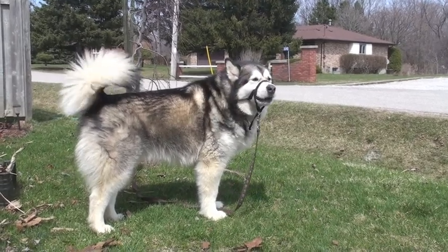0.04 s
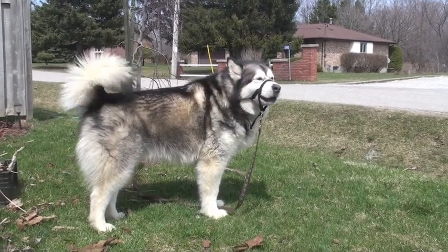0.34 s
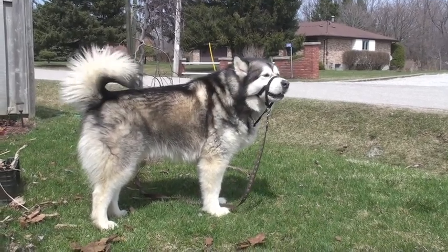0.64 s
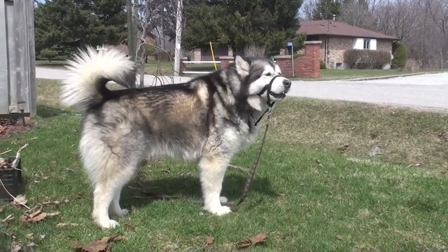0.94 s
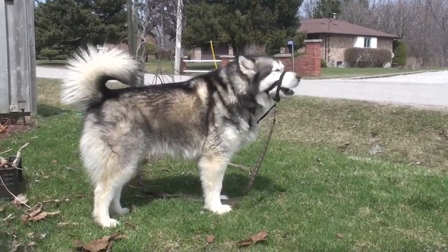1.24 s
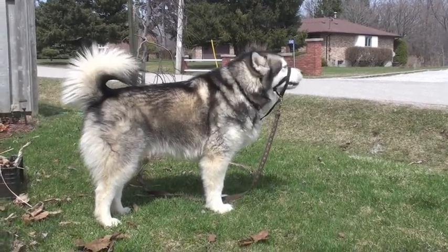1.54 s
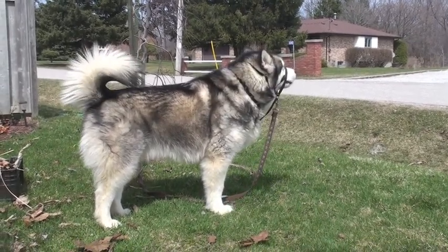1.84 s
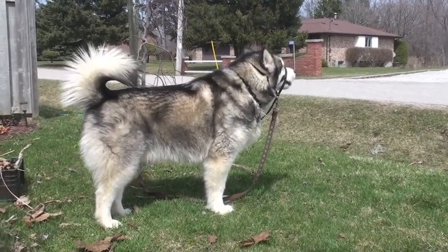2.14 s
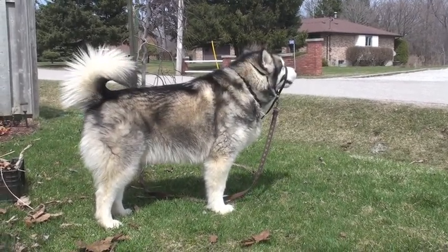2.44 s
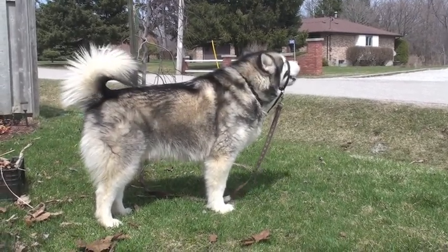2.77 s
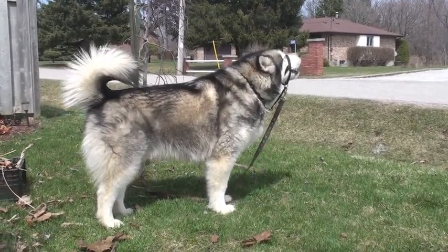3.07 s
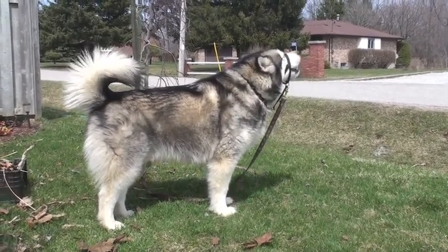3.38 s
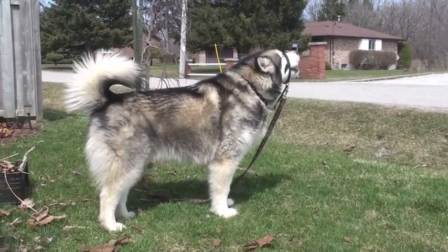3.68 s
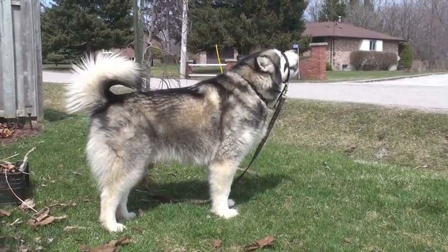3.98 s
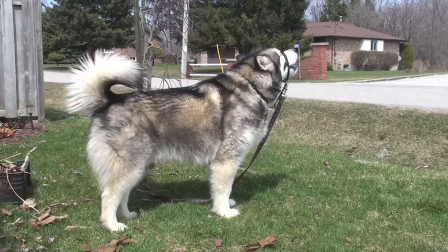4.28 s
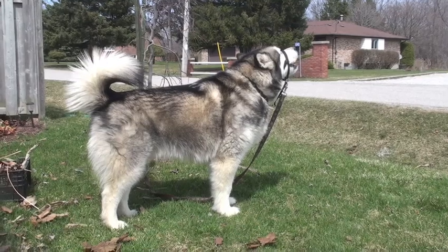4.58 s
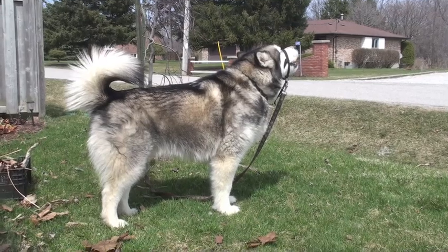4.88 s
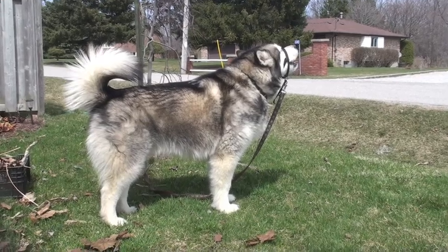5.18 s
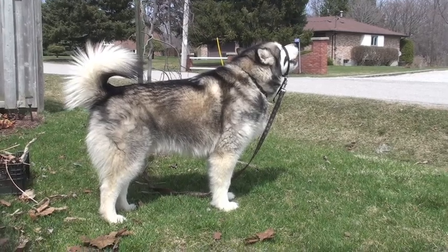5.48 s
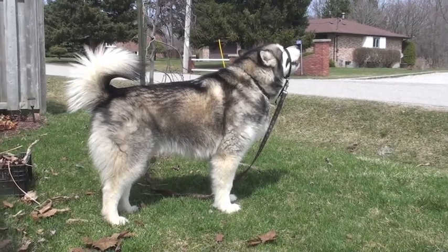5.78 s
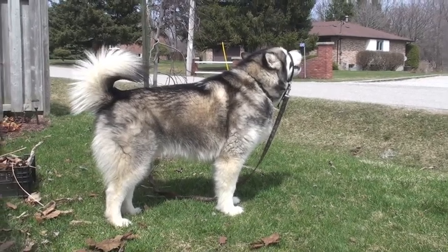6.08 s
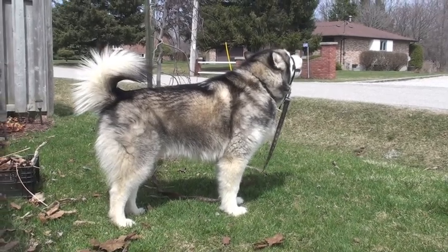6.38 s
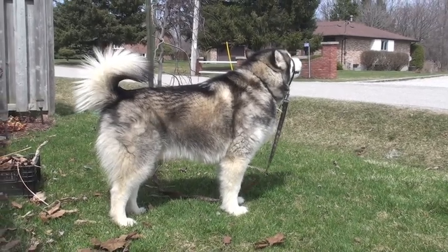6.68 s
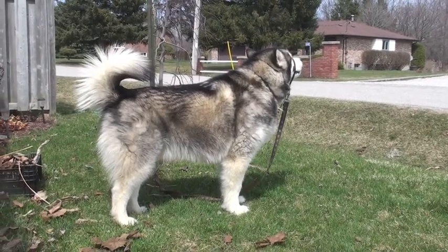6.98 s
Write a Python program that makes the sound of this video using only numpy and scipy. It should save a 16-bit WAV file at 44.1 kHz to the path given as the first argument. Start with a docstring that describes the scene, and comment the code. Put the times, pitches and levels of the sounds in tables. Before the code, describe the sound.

Outdoors near a quietly humming street, wind buffets the microphone while a big dog howls close by. One short howl slides down, followed by a quick breath and a pause. Then a short growl swells into a long, held howl that slowly falls and drops away. The dog sounds almost dry, with only slight reverberation from houses, and a distant bird gives a few faint chirps at the end.

```python
"""Over a humming street, with gusts buffeting the microphone, a big sled dog howls on a lawn a few steps away.
Its vocal folds give a sliding note whose harmonics flare and fade by interference with echoes from ground
and walls, until the folds slacken and the pitch sags. The dog draws a short hiss of air; then uneven slaps
of the folds make a rough growl that locks into a second, longer howl. As that one sags, a bird chirps
far off. The houses answer both with faint reverberation."""
import sys
import numpy as np
from scipy import signal
from scipy.fft import rfft, irfft, next_fast_len
from scipy.io import wavfile
from scipy.ndimage import uniform_filter1d, minimum_filter1d, map_coordinates

SR = 44100
rng = np.random.default_rng(int(sys.argv[2]) if len(sys.argv) > 2 else 0)


def waveform_to_disk(signal):
    """Save audio, clipped to [-1, 1], as 16-bit WAV at the path in sys.argv[1]."""
    frames = np.transpose(np.atleast_2d(signal))
    scaled = np.clip(frames, -1, 1) * 32767
    samples = np.round(scaled).astype(np.int16)
    wavfile.write(sys.argv[1], SR, samples)


N = 309582
TIME = np.arange(N) / SR


def amp(db):
    """Decibels to amplitude ratio."""
    return 10 ** (np.asarray(db) / 20)


def unit(x):
    """Normalisation to rms 1."""
    return x / np.sqrt(np.mean(x ** 2) + 1e-20)


def along(points, hz):
    """Interpolation of (Hz, value) points on a logarithmic frequency axis."""
    knots_hz, values = np.transpose(points)
    return np.interp(np.log(hz + 1), np.log(knots_hz + 1), values)


def curves(rows):
    """Linear interpolation in time: one curve for each column after the first."""
    times, *columns = np.transpose(rows)
    return [np.interp(TIME, times, column) for column in columns]


def sounding(rows, fade):
    """A gate with linear fades, open from the first row's time to the last."""
    return np.clip((TIME - rows[0][0]) / fade, 0, 1) * np.clip((rows[-1][0] - TIME) / fade, 0, 1)


def swell(start, length):
    """A half-sine envelope."""
    return np.sin(np.pi * np.clip((TIME - start) / length, 0, 1))


def held(start, length, attack, release):
    """An envelope that rises, holds until start + length, then decays exponentially."""
    age = TIME - start
    return np.clip(age / attack, 0, 1) * np.exp(-np.maximum(age - length, 0) / release)


def wobble(rate):
    """Smooth random modulation, rate knots a second."""
    return map_coordinates(rng.standard_normal(int(N * rate / SR) + 4), [TIME * rate])


def filtered(x, response):
    """Linear filtering: the spectrum of x times a frequency response."""
    size = next_fast_len(N + SR // 2)
    return irfft(rfft(x, size) * response(np.fft.rfftfreq(size, 1 / SR)), size)[..., :N]


def rush(spectrum, coherence):
    """Partially coherent stereo noise of rms 1, from (Hz, dB) and (Hz, left-right coherence) points."""
    def mid_and_side(hz):
        angle = np.arccos(np.clip(along(coherence, hz), -1, 1)) / 2
        return np.array([np.cos(angle), np.sin(angle)])
    mid, side = filtered(rng.standard_normal((2, N)), mid_and_side)
    return unit(filtered(np.array([mid + side, mid - side]), lambda hz: amp(along(spectrum, hz))))


# The street's hum. Each row: frequency in Hz, relative spectral density in dB.
STREET_SPECTRUM = [(59, -28.5), (100, -4), (270, -12), (347, -20.5), (487, -17.5), (712, -14.5), (842, -14),
                   (1210, -18), (1430, -19.5), (2270, -29), (3540, -39.5), (6120, -47.5), (7250, -45.5),
                   (15500, -54.5)]
# Its likeness in the two channels. Each row: frequency in Hz, coherence from 0 to 1.
STREET_COHERENCE = [(60, 0.65), (180, 0.29), (550, 1), (1650, 1), (4970, 0.46), (15000, 0.42)]

def street():
    """Superposition: far traffic and trees add up to a nearly steady noise."""
    return amp(-45.5 + 1.7 * wobble(3.2)) * rush(STREET_SPECTRUM, STREET_COHERENCE)


# Decay among the houses. Each row: frequency in Hz, time to fall by 60 dB in seconds.
REVERB_TIMES = [(300, 0.35), (1500, 0.98), (8000, 0.056)]

def houses(x):
    """Reverberation: diffuse reflections from fence, houses and trees, the treble dying first."""
    hz, age, noise = signal.stft(rng.standard_normal((2, SR // 2)), SR, nperseg=256)
    decay = amp(-60 * age / along(REVERB_TIMES, hz)[:, None])
    _, tail = signal.istft(noise * decay, SR, nperseg=256)
    return signal.fftconvolve(x, tail / np.linalg.norm(tail[0]), axes=1)[:, :N]


# Birdsong. Each row: start and length in seconds, first and last pitch in Hz, level in dB.
BIRD_CHIRPS = [(6.31, .055, 4400, 3300, -65), (6.85, .055, 4270, 3410, -64), (6.905, .045, 2982, 3640, -67)]

def bird():
    """Frequency modulation: each chirp from the far trees is one gliding, wavering tone."""
    song = np.zeros(N)
    for start, length, first_hz, last_hz, db in BIRD_CHIRPS:
        hz = np.interp(TIME, [start, start + length], [first_hz, last_hz]) * (1 + .06 * wobble(200))
        song += amp(db) * swell(start, length) * np.sin(2 * np.pi * np.cumsum(hz) / SR)
    return np.array([song, song])


# Gusts, and soft thuds of air. Each row: start in seconds, length in seconds, relative level in dB.
GUSTS = [(0.418, 0.3, -38.5), (0.754, 0.38, -35), (1.47, .3, -44), (2.18, 0.09, -34), (2.797, 0.24, -28),
         (3.415, 0.18, -33), (3.871, .22, -33.5), (4.316, 0.5, -31)]
AIR_THUDS = [(2.213, 0.049, -37), (2.304, 0.017, -41.5), (6.286, .075, -32)]
# The wind's low rumble and brighter rush. Each row: frequency in Hz, relative spectral density in dB.
RUMBLE_SPECTRUM = [(15, -17.5), (40, -4.5), (90, -1), (160, -6), (260, -17), (500, -32), (1200, -69.5)]
GUST_SPECTRUM = [(60, -21.5), (150, 3.5), (300, -5), (800, -12.5), (1300, -27), (3000, -62)]

def wind(breeze_drop_db_per_s=0.64):
    """Turbulence: eddies hit each microphone port separately; strong gusts reach higher frequencies."""
    breeze = amp(-44.5 - breeze_drop_db_per_s * TIME)
    blasts = sum(amp(db) * held(start, length, attack=0.049, release=0.095) for start, length, db in GUSTS)
    wind_db = 20 * np.log10(np.hypot(breeze, blasts)) + 1.8 * wobble(7.5)
    eddies = amp(1.5 * np.array([wobble(22), wobble(22)]))
    rumble = amp(wind_db + 2.57) * unit(eddies * rush(RUMBLE_SPECTRUM, [(40, 0.61), (300, 0)]))
    thuds = sum(amp(db) * swell(start, length) for start, length, db in AIR_THUDS)
    gusts = (amp(1.26 * wind_db + 2.0) + thuds) * rush(GUST_SPECTRUM, [(300, 0)])
    return (rumble + gusts) * amp([[.6], [-.6]])  # a little to the left


# Air with and between the howls. Each row: start, length, attack and release in seconds, level in dB.
BREATHS = [(.3, 1.56, 1.0, 0.042, -57.5), (1.98, 0.17, 0.016, 0.056, -54.5), (2.1, 2.8, .8, .7, -63)]
# Faint sharp ticks. Each row: time in seconds, relative peak level in dB.
FAINT_TICKS = [(1.775, -46.5), (2.0141, -43), (2.029, -46.5), (2.0837, -40), (3.1517, -57.5),
               (3.7794, -60.5), (4.0494, -56.5), (4.3692, -51), (4.814, -48), (4.848, -50), (5.7058, -54),
               (5.7131, -54)]
# The colour of hiss and ticks. Each row: frequency in Hz, relative spectral density in dB.
HISS_SPECTRUM = [(1470, -43.5), (2500, -2), (2680, -5.5), (7000, -2.5), (7730, -9.5), (12400, -14.5),
                 (14900, -26), (15500, -41)]

def breath_and_ticks():
    """Flow noise: a grainy hiss of breath; apart from it, a few faint sharp ticks and crackles."""
    flow = sum(amp(db) * held(*timing) for *timing, db in BREATHS)
    grain = amp(2.5 * wobble(170))
    ticks = sum(amp(db + 3) * held(start, 0, attack=.0001, release=0.0013) for start, db in FAINT_TICKS)
    return (flow * grain + ticks) * rush(HISS_SPECTRUM, [(3000, 0.67)])


# Formants of throat and mouth. Each row: centre in Hz, width in Hz, relative gain in dB.
TRACT_FORMANTS = [(449, 130, -1), (683, 140, -9), (807, 230, 0), (1276, 250, -15), (1495, 150, -11),
                  (1633, 230, -17.5), (2200, 390, -23.5), (3850, 300, -52.5), (6200, 870, -51),
                  (8300, 400, -55.5)]

def vocal_tract(x):
    """Resonance: the excitation x rings in the steep formants of throat and mouth; rms 1."""
    def response(hz):
        return sum(amp(db) / (1 + 1.7j * (hz - centre) / width) ** 3
                   for centre, width, db in TRACT_FORMANTS)
    return unit(filtered(x, response))


# The swelling growl. Each row: time in seconds, relative level in dB.
GROWL_LEVELS = [(2.6, -66.5), (2.632, -32), (2.656, -34.5), (2.662, -21.5), (2.742, -17.5), (2.788, -10.5),
                (2.8, -13.5)]

def growl(slap_hz=290, scatter=.055, lock_s=2.775, glide_s=.03, fade_db_per_s=278):
    """Aperiodic vibration: the folds slap unevenly, with puffs of air, then lock on the second howl."""
    locked = np.clip((TIME - lock_s) / glide_s, 0, 1)
    howl_hz, _ = curves(SECOND_MELODY)
    rate = (1 - locked) * slap_hz + locked * howl_hz
    db = curves(GROWL_LEVELS)[0] - fade_db_per_s * np.maximum(TIME - GROWL_LEVELS[-1][0], 0)
    cycles = np.cumsum(rate * (1 + scatter * wobble(300))) / SR
    slaps = np.diff(np.floor(cycles), prepend=0) * amp(1.5 * wobble(300))  # one impulse a cycle
    puffs = rng.standard_normal(N) * (1 + np.cos(2 * np.pi * cycles))
    return amp(db + 0.7) * vocal_tract(unit(slaps) + .35 * unit(puffs)) * (TIME > GROWL_LEVELS[0][0])


# Echoes off ground and walls. Each row: left and right delay in ms, left and right amplitude ratio.
EARLY_ECHOES = [(0.54, 0.52, 0.46, 0.57), (1.32, 1.33, 0.2, 0.3), (1.86, 1.84, 0.21, 0.16),
                (5.32, 5.2, 0.08, 0.15), (7.78, 7.7, 0.2, 0.15), (8.29, 8.2, 0.45, 0.29),
                (14.28, 14.29, 0.02, 0.07), (17.69, 17.61, 0.07, 0.08)]

def interference(hz):
    """Interference of the direct sound with its echoes: complex gain at the left and right port."""
    grid_hz = np.arange(SR // 2)
    delays_ms, gains = np.hsplit(np.array(EARLY_ECHOES), 2)
    echoes = gains[..., None] * np.exp(-2j * np.pi * grid_hz * delays_ms[..., None] / 1000)
    return np.array([np.interp(hz, grid_hz, port) for port in 1 + echoes.sum(axis=0)])


def throat_gain(rows, opening, hz):
    """A variable filter: its gain in dB moves between a table's closed and open columns."""
    table = np.array(rows)
    closed_db, open_db = along(table[:, [0, 1]], hz), along(table[:, [0, 2]], hz)
    return amp((1 - opening) * closed_db + opening * open_db)


# The howl's vowel. Each row: frequency in Hz, relative gain in dB with the jaw nearly shut, then open.
VOWEL_GAINS = [(250.0, -15, 2.1), (401, 1.5, -12.5), (600.0, 15.5, -14.5), (813, 3, 12.1), (965, -3.5, 8.5),
               (1248.4, 3.5, -6), (1467, -34, 5), (1570, -32.5, -23), (1790, -33, -8), (2110, -37.5, -23)]

def low_harmonics(phase, pitch, jaw, shimmer, flare_db=2.0, count=5):
    """Source and filter: the folds' lowest harmonics, shaped by mouth and echoes; stereo, rms near 1."""
    wave, power = np.zeros((2, N)), np.zeros(N)
    for k in range(1, count + 1):
        gain = throat_gain(VOWEL_GAINS, jaw, k * pitch) * interference(k * pitch)
        gain *= amp(flare_db * (k / count) ** 4 * wobble(8))  # the weak, higher ones waver most
        lag = np.pi * k * k / 3  # the throat delays higher harmonics more
        wave -= (1 + shimmer * wobble(170)) * np.imag(gain * np.exp(1j * (k * phase - lag)))
        power += np.abs(gain.mean(axis=0)) ** 2
    return wave / np.sqrt(power / 2)


def resonances(modes, hz, valley_db=-36):
    """A resonance curve: Gaussian peaks over valleys that darken toward the treble."""
    peaks = sum(amp(db) * np.exp(-2 * ((hz - centre) / width) ** 2) for centre, width, db in modes)
    return peaks + amp(valley_db) / (1 + (hz / 9000) ** 4)


# High modes of the pursed and the open muzzle. Each row: centre in Hz, width in Hz, relative gain in dB.
PURSED_MODES = [(4450, 350, -22), (5200, 300, -20), (5950, 420, -6), (6350, 400, 0), (7120, 240, -14),
                (8030, 300, -10), (8800, 400, -20), (12650, 450, -30)]
OPEN_MODES = [(4550, 350, -11), (5150, 220, -4), (5500, 220, -7), (6020, 280, 1), (6600, 300, -8),
              (6980, 380, 0), (8150, 450, -13), (8920, 330, -7), (10450, 450, -18), (12900, 600, -28)]

def muzzle_gain(lips, hz):
    """Cavity resonance: as the lips part, the pursed muzzle's modes give way to the open one's."""
    grid_hz = np.arange(0, SR / 2, 20)
    pursed = np.interp(hz, grid_hz, resonances(PURSED_MODES, grid_hz))
    parted = np.interp(hz, grid_hz, resonances(OPEN_MODES, grid_hz))
    return (1 - lips) * pursed + lips * parted


def overtones(phase, pitch, gain_at, orders, ripple_db, wall_gain=0.34, wall_delay_s=.008):
    """Comb filtering: harmonics glide through resonances and flare where a wall's echo adds; rms 1."""
    wave, power = np.zeros(N), np.zeros(N)
    delay = wall_delay_s * (1 + 0.0078 * wobble(1.4))  # the head sways a little
    for k in orders:
        comb = 1 + wall_gain * np.cos(2 * np.pi * k * pitch * delay)
        ripple = amp(ripple_db * (wobble(4.5) + wobble(22) / 2))
        gain = gain_at(k * pitch) * comb * ripple
        wave += gain * np.sin(k * phase + rng.uniform(0, 2 * np.pi))
        power += gain ** 2
    return wave / np.sqrt(power / 2)


# Jaw and lips, which close in for the long note. Each row: time in seconds, opening from 0 to 1.
JAW_OPENING = [(0.0, 0.53), (0.25, 0.5), (0.5, 0.64), (1.2, 0.8), (1.38, 1.0), (1.8, 0.43), (2.85, 0.53),
               (2.93, 0.14), (3.6, 0.09), (4.2, 0.01), (5.65, 0.24), (5.76, 0.67), (6.5, 0.45)]
LIP_PARTING = [(2.85, 1), (3.05, 0), (5.6, 0), (5.76, .9)]
# The throat's upper response. Each row: frequency in Hz, relative gain in dB with lips pursed, then open.
UPPER_GAINS = [(1400, -2, -2), (1800, -3, -3), (2170, 1, 3), (2450, -7, -9), (2820, -5, -8),
               (3100, -28, -32), (3300, -28, -34), (3550, -13, -22), (3850, -32, -38), (4400, -50, -55)]

def howl(melody, ring_levels, jitter, shimmer, fray_db, breath_db, throat_db, ring_db):
    """Periodic vibration: steady folds give a harmonic series, rougher as they slacken and the pitch sags."""
    pitch, db = curves(melody)
    ring, = curves(ring_levels)
    jaw, = curves(JAW_OPENING)
    lips, = curves(LIP_PARTING)
    slack = 1 + 4 * np.clip((350 - pitch) / 70, 0, 1)  # grows as the pitch falls below 350 Hz
    unsteady_hz = pitch * (1 + jitter * slack * (wobble(45) + wobble(260)))
    phase = 2 * np.pi * np.cumsum(unsteady_hz) / SR
    voice = amp(db + 0.01) * low_harmonics(phase, pitch, jaw, shimmer * slack)
    # uneven closing of the folds shakes the overtones most, and slackness weakens them
    closing = amp(fray_db * slack * wobble(70) - .7 * (slack - 1))
    upper = overtones(phase, pitch, lambda hz: throat_gain(UPPER_GAINS, lips, hz), range(6, 14),
                      ripple_db=3.0)
    whistle = overtones(phase, pitch, lambda hz: muzzle_gain(lips, hz), range(10, 37), ripple_db=3.5)
    upper_db = throat_db - 34 + .25 * ring + 7.5 * jaw
    voice += closing * (amp(upper_db) * upper + amp(ring + ring_db) * whistle)
    # air escapes once a cycle, in step with the loudness
    puffs = rng.standard_normal(N) * (1 + np.cos(phase))
    voice += amp(breath_db + db) * np.sqrt(slack) * vocal_tract(puffs)
    voice += amp(ring - 19) * unit(filtered(puffs, lambda hz: resonances(PURSED_MODES, hz)))
    return voice * sounding(melody, fade=0.0082)


# The sliding note of each howl. Each row: time in seconds, pitch in Hz, relative level in dB.
FIRST_MELODY = [(0.0, 352.8, -18), (0.01, 356.2, -19), (0.066, 351.7, -22), (0.2, 341.0, -25),
                (0.298, 343.0, -25), (0.426, 356.2, -19), (0.746, 358.0, -17), (0.85, 348.1, -22),
                (1.004, 358.8, -17), (1.07, 362.9, -18), (1.262, 369.9, -18), (1.396, 350.3, -17),
                (1.442, 344.0, -21), (1.566, 324.1, -22), (1.642, 308.8, -30), (1.7, 300.5, -27),
                (1.736, 284.7, -25), (1.812, 249.9, -30), (1.85, 248.0, -48)]
SECOND_MELODY = [(2.81, 361.4, -19), (2.83, 369.4, -20), (2.85, 405.2, -9.5), (2.86, 421.3, -8),
                 (2.9, 436.5, -10.5), (2.92, 445.4, -7), (3.1, 437.2, -12), (3.56, 434.4, -15.5),
                 (3.63, 430, -16), (4.1, 415.7, -8.5), (4.41, 403.8, -9.5), (5.04, 393, -8.5),
                 (5.31, 401, -9.5), (5.68, 394.6, -8), (5.7, 391.2, -8.5), (5.72, 381.3, -7.5),
                 (5.74, 370.7, -13.5), (5.91, 373.5, -12.5), (5.99, 367.5, -15.5), (6.18, 346, -29),
                 (6.33, 317, -22.5), (6.36, 308.8, -25), (6.42, 291.2, -24), (6.44, 283.5, -29),
                 (6.52, 251.8, -26.5), (6.54, 245.4, -29.5), (6.56, 243, -54)]
# The whistling treble ring of each howl. Each row: time in seconds, relative level in dB.
FIRST_RING_LEVELS = [(0.02, -51.5), (0.044, -49), (0.258, -55), (0.368, -47.5), (0.578, -53),
                     (0.876, -45.5), (0.918, -50), (1.268, -44.5), (1.55, -68)]
SECOND_RING_LEVELS = [(2.81, -54), (2.89, -46), (2.91, -52), (3.08, -55), (3.61, -44.5), (3.67, -39.5),
                      (3.97, -36.5), (4.46, -47), (5.63, -52.5), (5.85, -61.5), (5.97, -58), (6.36, -64.5),
                      (6.55, -80)]

def sled_dog():
    """Phonation: two howls, the second breaking out of a growl."""
    first = howl(FIRST_MELODY, FIRST_RING_LEVELS, jitter=0.0016, shimmer=0.024, fray_db=0.84,
                 breath_db=-41.0, throat_db=2.5, ring_db=-1.0)
    second = howl(SECOND_MELODY, SECOND_RING_LEVELS, jitter=.0014, shimmer=0.011, fray_db=1.0,
                  breath_db=-40.5, throat_db=-2, ring_db=-1.3)
    return (first + second + growl()) * amp([[.25], [-.25]])


def scene():
    """Direct and reverberant sound: the near dog is almost dry, the far bird echoes, amid wind and street."""
    near = sled_dog() + breath_and_ticks()
    far = bird()
    reverberation = houses(amp(-23) * near + amp(1) * far)
    return near + far + reverberation + wind() + street()


def record(dry, ceiling=.94, reaction_s=.012, top_hz=15650):
    """Peak and band limiting: the gain eases down for peaks over the ceiling; a low-pass follows."""
    size = int(reaction_s * SR) | 1
    needed = np.minimum(1, ceiling / (np.abs(dry).max(axis=0) + 1e-9))
    gain = uniform_filter1d(minimum_filter1d(needed, 2 * size + 1), size)
    return filtered(dry * gain, lambda hz: hz < top_hz)


dry = scene()
out = record(dry)
waveform_to_disk(out)
```